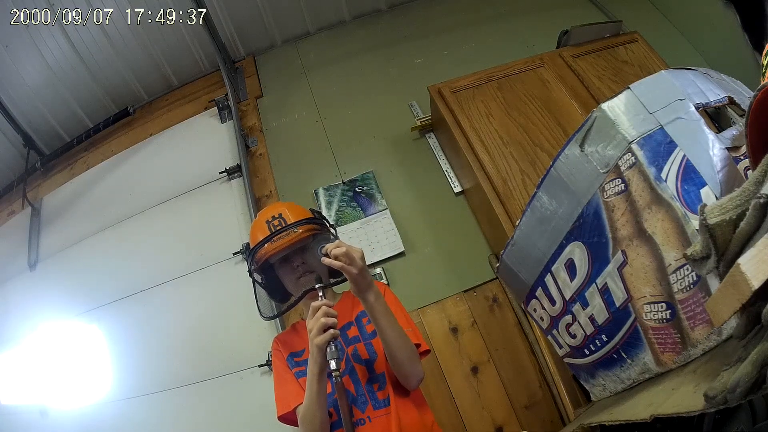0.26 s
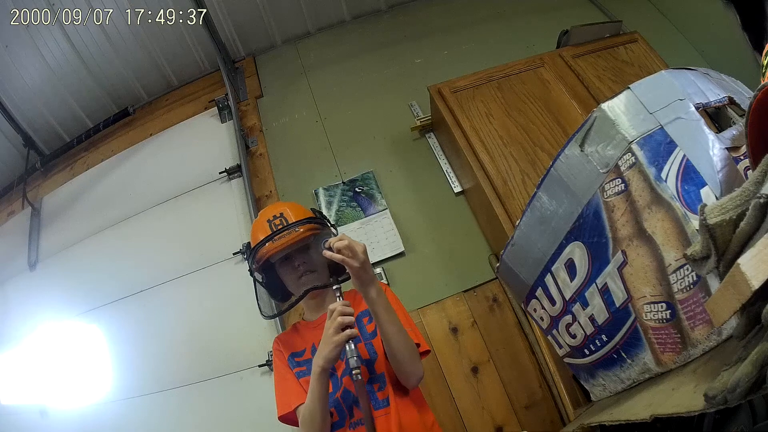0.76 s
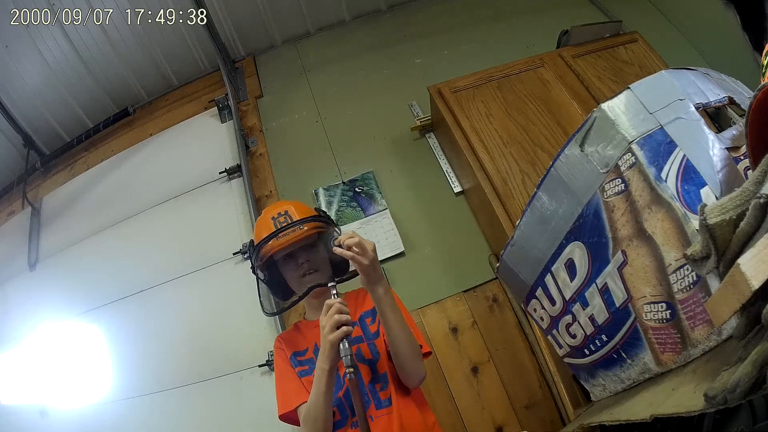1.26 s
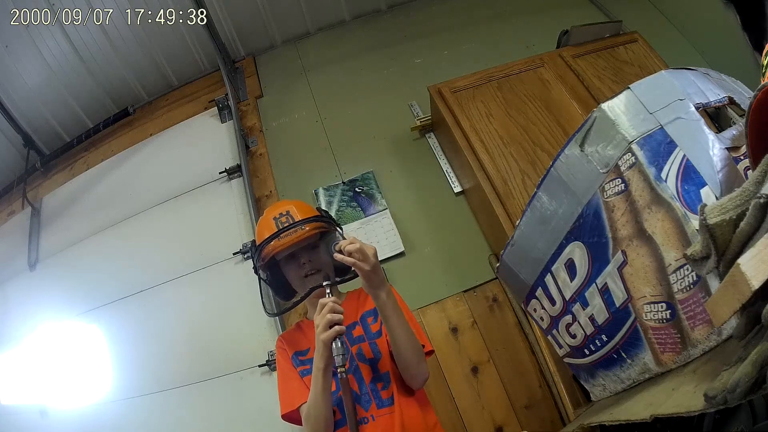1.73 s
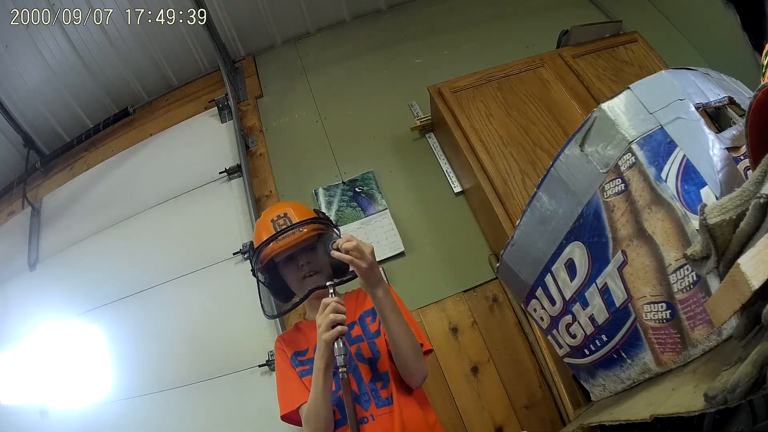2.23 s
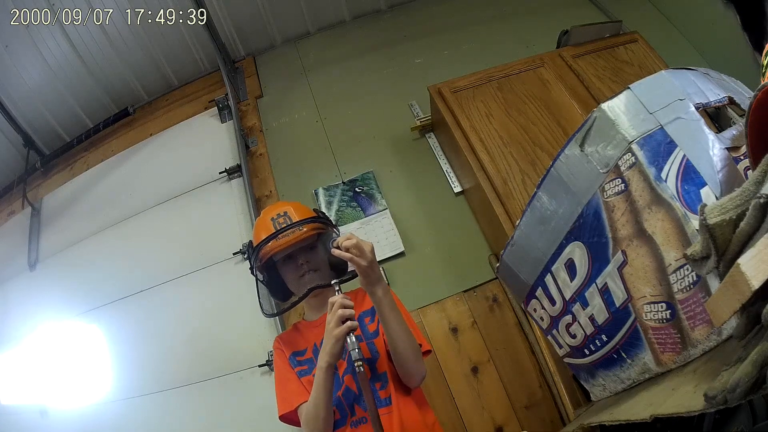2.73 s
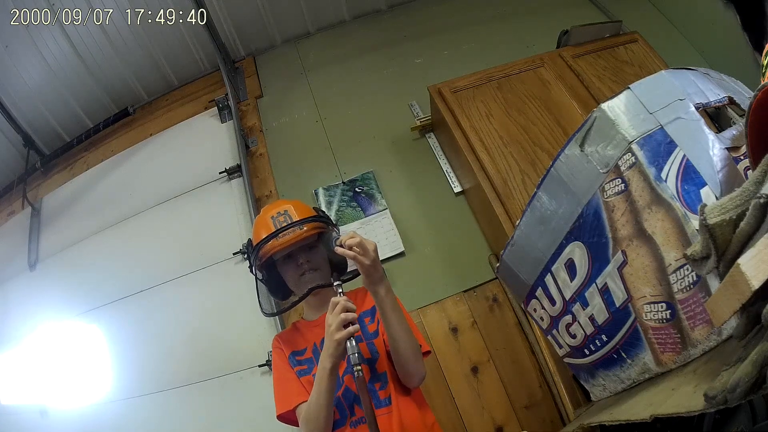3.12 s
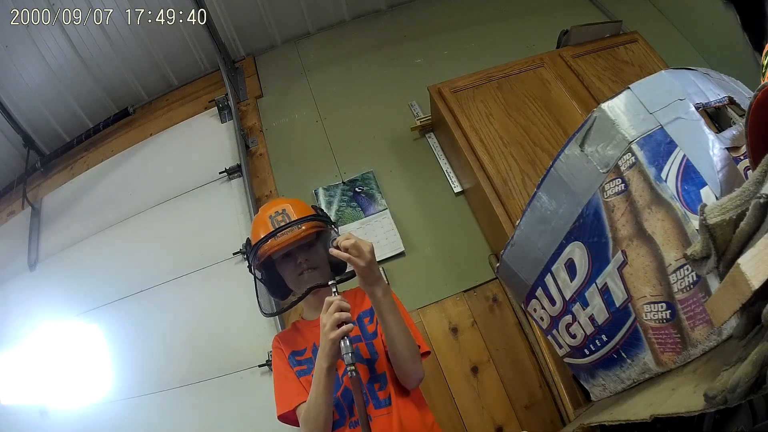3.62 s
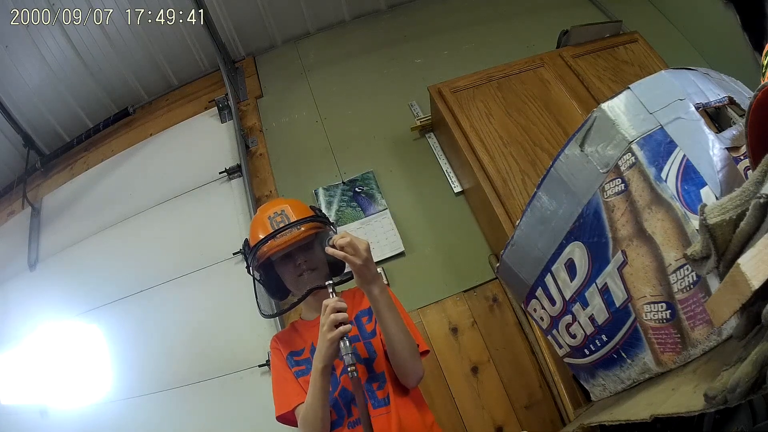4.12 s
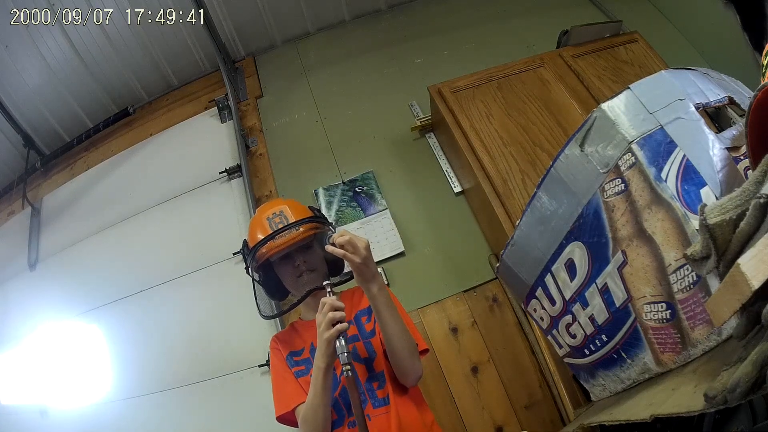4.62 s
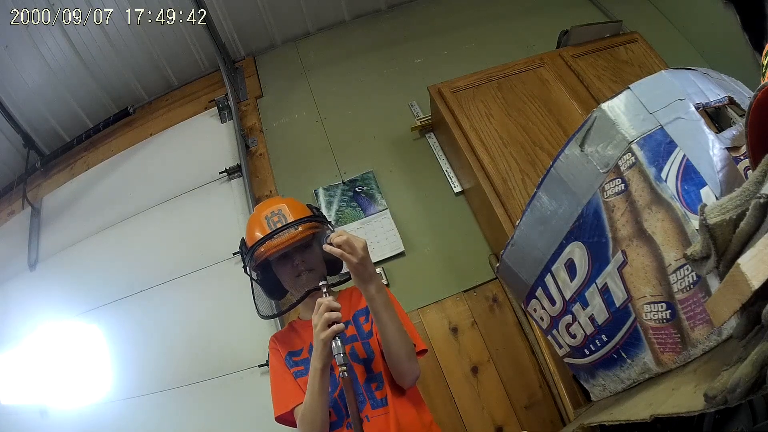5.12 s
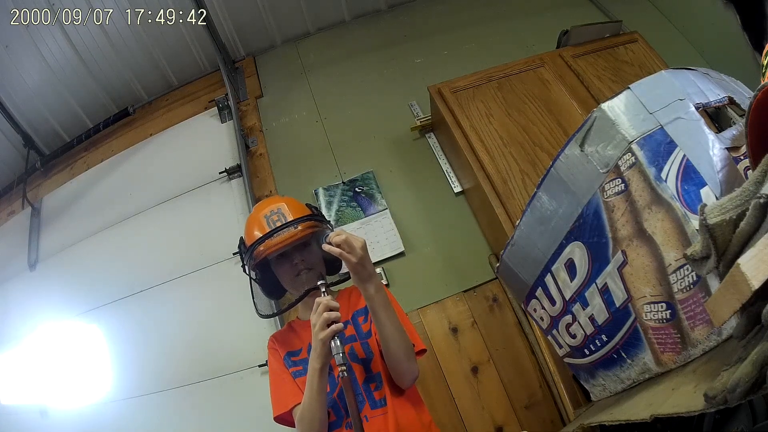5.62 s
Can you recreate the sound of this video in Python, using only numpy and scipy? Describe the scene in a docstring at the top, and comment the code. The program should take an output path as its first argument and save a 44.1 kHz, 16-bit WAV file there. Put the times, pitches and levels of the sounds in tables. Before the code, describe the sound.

A blow gun hisses loudly in four pulls, its jet chopped to a rasp by a whirring hand-held toy that coasts between them.

```python
"""A rasping air hiss over a buzz is heard at once: a blow gun spins a small hand-held rotor in a workshop.
Four bursts of compressed air are filtered noise; two vanes chop the jet twice a turn, so the hiss rasps.
The rotor buzzes as sines at multiples of its turn rate, shaped by resonances of the toy and the room.
Between bursts the room rings out and the rotor coasts down on its faintly sizzling bearing.
The microphone picks up all this direct and by way of the room, over a quiet workshop background."""
import sys
import numpy as np
from scipy import signal
from scipy.fft import rfft, irfft, next_fast_len
from scipy.io import wavfile
from scipy.ndimage import uniform_filter1d, minimum_filter1d, map_coordinates

SR = 44100
rng = np.random.default_rng(int(sys.argv[2]) if len(sys.argv) > 2 else 0)


def store_pcm(level_fs):
    """Save levels as 16-bit WAV."""
    pcm = np.round(np.clip(level_fs, -1, 1) * 32767).astype(np.int16)
    wavfile.write(sys.argv[1], SR, np.atleast_2d(pcm).T)


N = 258867
TIME = np.arange(N) / SR


def undb(db):
    """Decibels to gain."""
    return 10 ** (np.asarray(db) / 20)


def unit(x):
    """Scale to rms 1."""
    return x / np.sqrt(np.mean(x ** 2))


def on_log_axis(hz, points):
    """Read (Hz, value) points on a log-frequency axis."""
    f, value = np.transpose(points)
    return np.interp(np.log(hz + 1), np.log(f), value)


def colour(x, points):
    """Weight the spectrum of a signal by (Hz, dB) points; rms 1."""
    size = next_fast_len(N)
    gain = undb(on_log_axis(np.fft.rfftfreq(size, 1 / SR), points))
    return unit(irfft(rfft(x, size) * gain, size)[:N])


def resonate(x, hz, width_hz):
    """One resonance, gain 1 at its centre."""
    return signal.lfilter(*signal.iirpeak(min(hz, .45 * SR), hz / width_hz, fs=SR), x)


def noise():
    """White noise."""
    return rng.standard_normal(N)


def walk(rate, size=8):
    """Smooth chance with rms 1 and about `rate` new values a second, worked out every `size` samples."""
    steps = TIME[::size]
    values = map_coordinates(rng.standard_normal(4096), [steps * rate], order=3, mode="wrap")
    return np.interp(TIME, steps, unit(values))


def workshop_background(level_db=-58):
    """The quiet workshop behind the rotor: steady noise, strongest in the bass."""
    # background spectrum: f/Hz, relative level/dB per Hz
    shop_spectrum = [(20, -3.5), (60, -6), (150, -6.5), (400, -4), (800, -12), (1500, -21), (4000, -16),
                     (15000, -18)]
    return undb(level_db) * colour(noise(), shop_spectrum)


def reverberation(first_s=0.0072, build_s=0.0059):
    """One response of the workshop to a click: noise whose bands die away at their own rates."""
    # reverberation of the place: f/Hz, time to fall by 60 dB/s
    decay_times = [(200, 0.26), (1000, 0.96), (3000, 0.75), (7000, 0.69), (11000, 0.69), (15000, 0.53)]
    t = TIME[:SR]
    spectrum, hz = rfft(rng.standard_normal(SR)), np.fft.rfftfreq(SR, 1 / SR)
    tail = 0
    for band, (_, t60) in zip(np.eye(len(decay_times)), decay_times):
        # each band fades into its neighbours
        weight = on_log_axis(hz, [(row[0], w) for row, w in zip(decay_times, band)])
        tail = tail + irfft(spectrum * weight, SR) * np.exp(-np.log(1000) * t / t60)
    tail = tail * np.clip((t - first_s) / build_s, 0, 1)
    return tail / np.sqrt(np.sum(tail ** 2))


def room(x, count=7):
    """The jet swings about, so it feeds ever changing paths round the room."""
    aim = np.array([walk(20) for _ in range(count)])
    aim = aim / np.sqrt(np.sum(aim ** 2, axis=0))
    lead, out = SR // 2, 0
    for share in aim * x:
        # the air is already blowing at the start, so the room is already full of it
        running = np.concatenate([share[:lead][::-1], share])
        out = out + signal.fftconvolve(running, reverberation())[lead:lead + N]
    return out


def jolts(decay_s=0.0055, low_hz=45, high_hz=800, level_db=-3):
    """Short dull bumps as the jet catches the rotor and shoves it on its axle: bursts of low noise."""
    # jolts: t/s, peak level/dB ahead of level_db
    shoves = [(1.026, -33), (1.033, -36), (1.042, -37), (1.071, -29), (1.079, -31), (1.109, -33),
              (2.86, -39), (2.884, -37), (2.921, -35), (3.262, -35)]
    push = np.zeros(N)
    for s, db in shoves:
        age = TIME - s + 0.0014  # each bump starts this much before its listed time
        push += (age > 0) * undb(db) * np.exp(-np.abs(age) / decay_s)
    band = signal.butter(1, [low_hz, high_hz], "band", fs=SR, output="sos")
    thud = signal.sosfilt(band, noise())
    return undb(level_db) * push * unit(thud)


def bearing(turns, speed, level_db=-44.0, speed_db=80, top_speed=113, grit_db=2, throb=.25,
            tick_db=-15, tick_spread_db=5, tick_s=0.00033):
    """The dry bearing sizzles, up speed_db per tenfold speed until top_speed (turns/s), and ticks each turn."""
    # sizzle spectrum: f/Hz, relative level/dB per Hz
    sizzle_spectrum = [(300, -14.5), (1500, -25), (4000, -27), (7000, -12), (9000, -10.5), (11500, -3),
                       (12800, 0), (13350, 2), (13800, 1), (14600, -8), (15800, -5.5)]
    grit = undb(grit_db * walk(710)) * (1 + throb * np.cos(2 * np.pi * 2 * turns))
    once_a_turn = np.diff(np.floor(turns), prepend=0)
    knocks = once_a_turn * undb(tick_spread_db * np.clip(noise(), -2, 2))
    fading = signal.lfilter([1], [1, -np.exp(-1 / (tick_s * SR))], knocks)
    ticks = unit(fading * noise())
    loudness_db = level_db + speed_db * np.log10(np.minimum(speed, top_speed) / speed.mean())
    sizzle = unit(noise() * grit) + undb(tick_db) * ticks
    return colour(sizzle, sizzle_spectrum) * undb(loudness_db)


def rotor_speed():
    """Speed of the rotor, in turns per second: mostly climbing under the jet and sinking without it."""
    # rotor speed: t/s, turn rate f/Hz
    speed_points = [(0, 125.9), (.58, 132.5), (.7, 128), (.8, 119.7), (1.07, 108.2), (1.31, 111.2),
                    (1.52, 101.6), (1.9, 102.2), (2.14, 108.9), (2.38, 113.2), (2.87, 92.3), (3.14, 96.3),
                    (3.3, 92.3), (3.42, 96.1), (3.92, 103.6), (4.1, 102.8), (4.48, 87.2), (4.72, 90),
                    (5.5, 87.1), (5.87, 84.2)]
    s, turns_per_s = np.transpose(speed_points)
    return np.interp(TIME, s, turns_per_s)


def pushes(bite_s=0.015, release_s=0.029, chop_depth=0.53):
    """Grip of the jet on the vanes (0-1), and buzz drive, unevenness, brightness and chopping in each push."""
    # pushes, while the jet bears squarely on the vanes: start t/s, end t/s,
    # buzz drive level/dB at start, middle and end, odd multiples level/dB, tilt level/dB per octave,
    # added depth of chopping [exponent]
    square_hits = [(0.018, 0.552, -57.5, -56.5, -54.5, -2.5, 1.5, -.12),
                   (1.11, 1.265, -60, -61.5, -62, 1, 1.3, .11),
                   (1.538, 2.347, -65.5, -61.5, -59.5, 3, 1.6, -0.0065),
                   (2.94, 3.114, -62, -62, -62.5, 3, 0.19, 0.087),
                   (3.287, 4.024, -68, -61.5, -66.5, 5.5, 1.3, .12),
                   (4.49, 5.87, -69, -69.5, -73.5, 3.5, 1.5, 0.0087)]
    grip, drive, odd_db, tilt_db, depth = np.zeros((5, N))
    for start, end, first_db, middle_db, last_db, uneven_db, bright_db, chop in square_hits:
        # takes hold ahead of the start, lets go after the end
        hold = np.exp(np.minimum(TIME - start, 0) / bite_s - np.maximum(TIME - end, 0) / release_s)
        drive_db = np.interp(TIME, [start, (start + end) / 2, end], [first_db, middle_db, last_db])
        grip += hold
        drive += hold * undb(drive_db)
        odd_db += hold * uneven_db
        tilt_db += hold * bright_db
        depth += hold * chop
    return np.minimum(grip, 1), drive, odd_db, tilt_db, chop_depth + depth


def body(hz, sparse_hz=400):
    """Gain of the resonances at this pitch; well below sparse_hz little passes between them."""
    # resonances of toy and room that the buzz lines glide through: f/Hz, width/Hz, level/dB
    body_modes = [(176, 7, 18.5), (222, 6, 15), (263, 6, 10), (384, 9, 8), (413, 9, 9), (440, 6, 8),
                  (478, 22, 13), (526, 12, 6), (563, 14, 12), (640, 36, 11), (771, 24, 11), (890, 28, 5.5),
                  (1025, 50, 5), (1110, 34, 6)]
    grid = np.arange(SR // 8)
    between = 1 - 1 / (1 + (grid / sparse_hz) ** 4)
    peaks = sum(undb(db) ** 2 / (1 + (2 * (grid - centre) / width) ** 2) for centre, width, db in body_modes)
    return np.interp(hz, grid, np.sqrt(between + peaks))


def buzz(turns, speed, drive, odd_db, tilt_db, coast_db=-77, coast_slope_db=67, waver_db=1.77,
         drift_db=1.26, wobble_rad=0.0096, smear_rad=0.78, round_db=-.5, pivot=6):
    """Pressure pulses of the vanes: lines at multiples of the turn rate, nearly in step, each wavering."""
    # pulse of two vanes, whose inequality gives odd multiples: multiple of turn rate, relative level/dB
    pulse_lines = [(1, -22), (2, -5.5), (3, -8), (4, 1), (5, -13), (6, 2.5), (7, -7), (8, 1), (9, -3.5),
                   (10, 1.5), (11, -3.5), (12, -1.5), (13, -3.5), (14, -3), (15, -5), (16, -5), (17, -7),
                   (18, -8), (19, -9), (20, -8)]
    # drive without the jet: coast_db at the mean speed, rising coast_slope_db per tenfold speed
    coast = undb(coast_db + coast_slope_db * np.log10(speed / speed.mean()))
    angle, out = 2 * np.pi * turns + wobble_rad * walk(50), 0
    for multiple, db in pulse_lines:
        k = round(multiple)
        # without the jet the pulses are rounder: each higher multiple is weaker
        strength = drive + coast * undb(k * round_db)
        line_db = db + k % 2 * odd_db + tilt_db * np.log2(k / pivot)
        line_db = line_db + waver_db * walk(24.03) + drift_db * walk(5.055)
        line = np.sin(k * angle + smear_rad * rng.standard_normal())
        out = out + strength * undb(line_db) * body(k * speed) * line
    return np.sqrt(2) * out


def trigger(surge_s=0.071, leak_s=0.0098, leak_db=-25.5):
    """Jet strength: the valve cracks and snaps open, the hose pressure surges and settles, the valve shuts."""
    # pulls of the trigger: opens t/s, starts to shut t/s, opening time/s, shutting time/s,
    # jet level/dB ahead of swerves and hiss trim, opening surge level/dB, swell level/dB per s
    pulls = [(0.0, 0.553, 0.0018, .016, -15.5, 1.2, 2.5), (1.017, 2.375, 0.0014, 0.13, -17.5, 9.5, 2.5),
             (2.857, 4.063, 0.0058, .015, -15, 5.5, -0.83), (4.473, 5.845, 0.0039, .06, -16, 1.5, -0.25)]
    # the hiss swells or dips as the aim wanders: t/s, half width/s (to 1/e), level/dB
    swerves = [(1.095, 0.026, 2.5), (1.35, 0.095, -3), (1.51, 0.03, 4), (2.94, .03, 3), (3.19, 0.034, -3),
               (3.3, 0.03, 2), (3.78, .08, -2.5), (4.03, 0.044, 0)]
    jet = np.zeros(N)
    for start, end, open_s, close_s, db, surge_db, swell_db in pulls:
        age = np.clip(TIME - start, 0, end - start)
        # the valve leaks just before it opens
        leak = undb(leak_db) * np.clip(2 * (1 + (TIME - start) / leak_s), 0, 1)
        opening = np.maximum(leak, np.exp(np.clip((TIME - start) / open_s, -20, 0)))
        valve = opening * np.clip(1 - (TIME - end) / close_s, 0, 1)
        # the pressure stored in the hose is spent within about surge_s
        jet += valve * undb(db + surge_db * np.exp(-age / surge_s) + swell_db * age)
    aim_db = sum(db * np.exp(-((TIME - s) / width) ** 2) for s, width, db in swerves)
    return jet * undb(aim_db)


def chopping(turns, depth, scatter_db=1.0, lopsided=0.085, sharp=0.25, flutter_db=0.6):
    """The turbulent jet flares each time that a vane cuts it, no two puffs alike."""
    vane = 2 * np.pi * 2 * turns
    puff_db = scatter_db * np.interp(2 * turns, np.arange(N), noise())
    flare = depth * (np.cos(vane) + sharp * np.cos(2 * vane)) + lopsided * np.cos(vane / 2)
    gate = np.exp(flare) * undb(puff_db)
    # even out the running power, then let it flutter
    return gate / np.sqrt(uniform_filter1d(gate ** 2, size=2048)) * undb(flutter_db * walk(25))


def low_rush(jet, grip, gate, level_db=-27, push_db=2, chop=1.14):
    """Air that strikes the toy and the fingers adds a lower rush, louder during a push."""
    # rush spectrum: f/Hz, relative level/dB per Hz
    rush_spectrum = [(40, -25.5), (150, -18.5), (300, -15.5), (600, -7), (1200, -1), (2200, 1.5),
                     (3200, 5.5), (5000, -6), (9000, -21)]
    eddies = colour(noise() * gate ** chop, rush_spectrum)
    return jet * undb(level_db + push_db * grip) * eddies


def jet_hiss(jet, gate, split_hz=7000, fine_chop=0.53, coarse_chop=1.14, trim_db=-1.0):
    """Turbulence of the air jet: chopped noise, rung by the nozzle and the gaps of the toy."""
    # jet spectrum: f/Hz, relative level/dB per Hz
    jet_spectrum = [(1000, -36), (1600, -31), (2500, -18), (3200, -17), (4800, -10), (5600, -6.5),
                    (7100, -3.5), (8200, -4), (9300, -3), (11400, 0), (12400, -1.5), (13700, -2.5),
                    (14700, -7), (15700, -27.5)]
    # resonances of the nozzle and the gaps of the toy: f/Hz, width/Hz, level/dB over the jet
    cavities = [(3200, 230, -13), (3690, 110, -5), (4280, 61, -2.5), (6800, 270, -12), (7260, 370, -8.5),
                (11600, 280, -28)]
    # the finest eddies form at the nozzle, ahead of the vanes, and are chopped less
    coarse = signal.lfilter(*signal.butter(2, split_hz, "low", fs=SR), unit(noise() * gate ** coarse_chop))
    fine = signal.lfilter(*signal.butter(2, split_hz, "high", fs=SR), unit(noise() * gate ** fine_chop))
    hiss = colour(coarse + fine, jet_spectrum)
    ringing = sum(undb(db) * resonate(hiss, hz, width) for hz, width, db in cavities)
    return undb(trim_db) * jet * unit(hiss + ringing)


def hands(x, lag_ms=1.6, drift_ms=0.187, share=0.13):
    """A short echo off the hands and visor; it shifts as they move and colours the hiss."""
    lag = (lag_ms + drift_ms * walk(1.2)) * SR / 1000
    return x + share * map_coordinates(x, [np.arange(N) - lag], order=3)


def scene(air_room_db=-3.5, buzz_room_db=-16):
    """Jet, rotor and bearing in the workshop, direct and by the room, over its quiet background."""
    speed = rotor_speed()
    turns = np.cumsum(speed) / SR
    jet = trigger()
    grip, drive, odd_db, tilt_db, depth = pushes()
    gate = chopping(turns, depth)
    air = hands(jet_hiss(jet, gate) + low_rush(jet, grip, gate))
    noises = air + bearing(turns, speed) + jolts()
    tone = buzz(turns, speed, drive, odd_db, tilt_db)
    echoes = room(undb(air_room_db) * noises + undb(buzz_room_db) * tone)
    return (noises + tone + echoes + workshop_background())[None]


def record(dry, ceiling=0.69, hold_s=0.00031, top_hz=15750):
    """A fast limiter behind the microphone holds the highest peaks down; the top is cut."""
    size = int(hold_s * SR) + 1
    gain = np.minimum(1, ceiling / (np.abs(dry) + 1e-9))
    gain = uniform_filter1d(minimum_filter1d(gain, size), size)
    top_cut = signal.ellip(10, .1, 60, top_hz, fs=SR, output="sos")
    return signal.sosfiltfilt(top_cut, dry * gain)


dry = scene()
out = record(dry)
store_pcm(out)
```